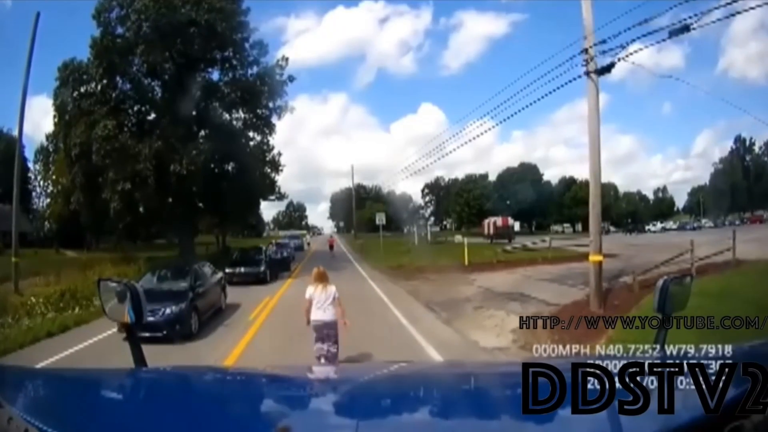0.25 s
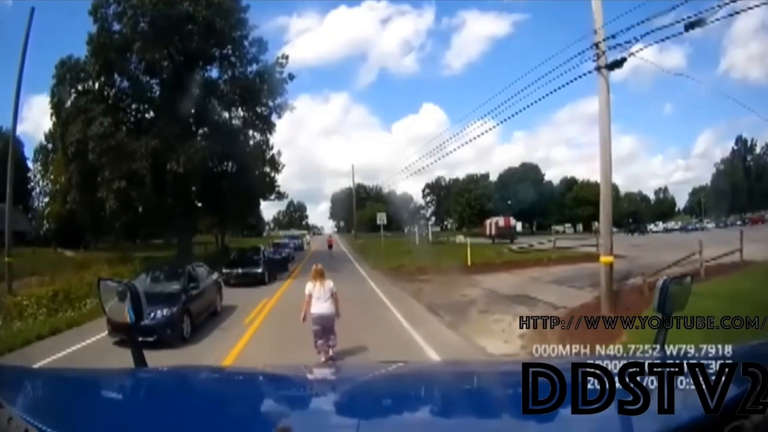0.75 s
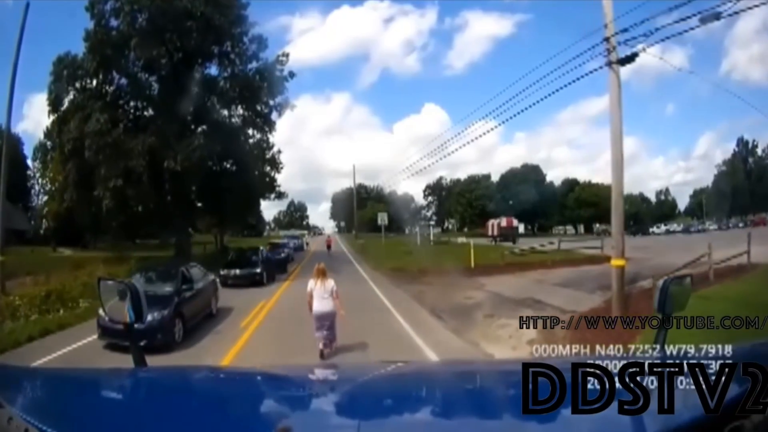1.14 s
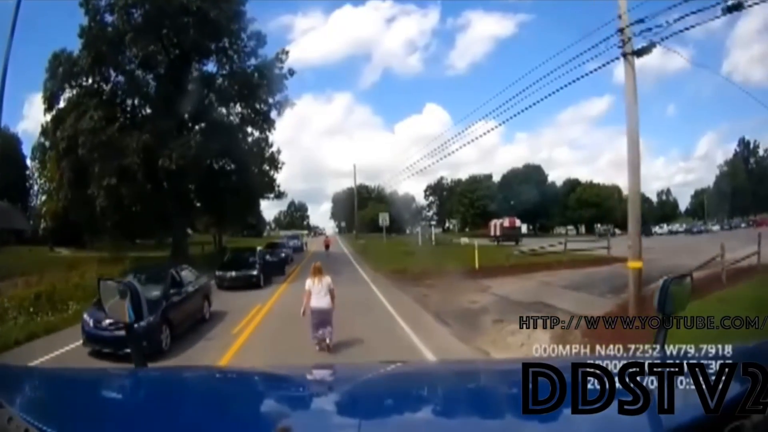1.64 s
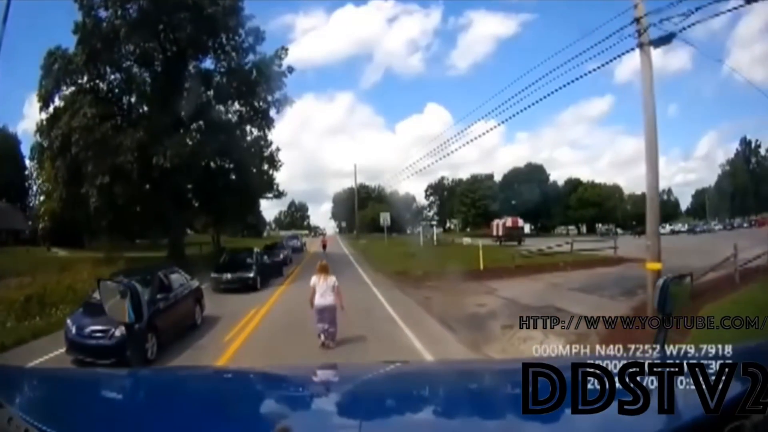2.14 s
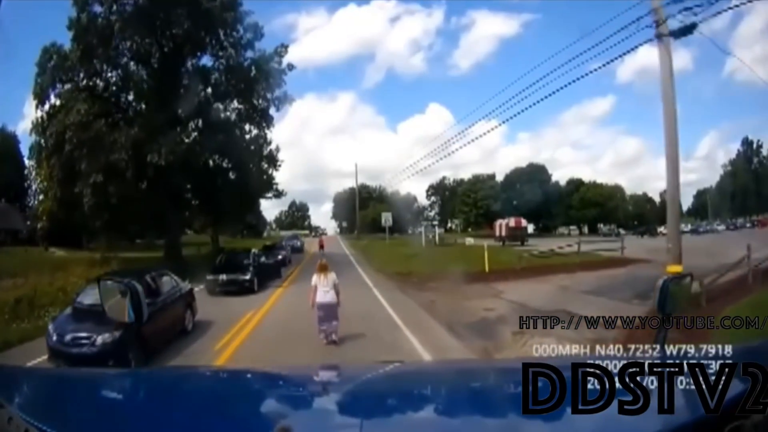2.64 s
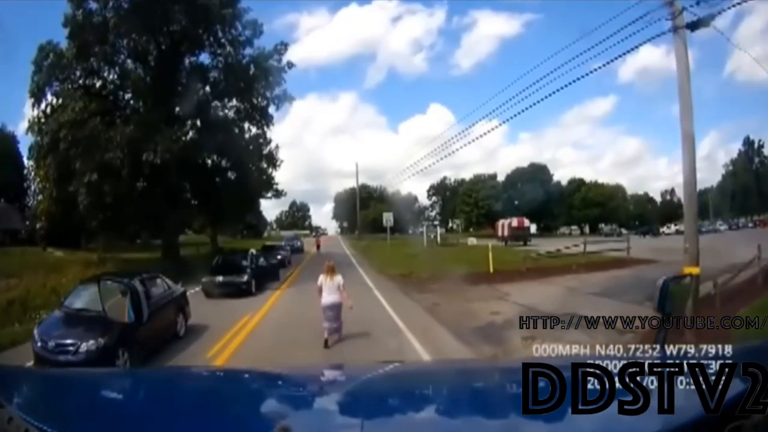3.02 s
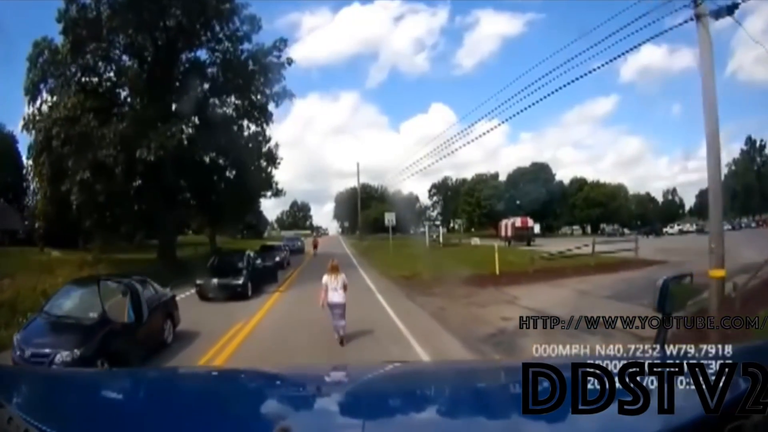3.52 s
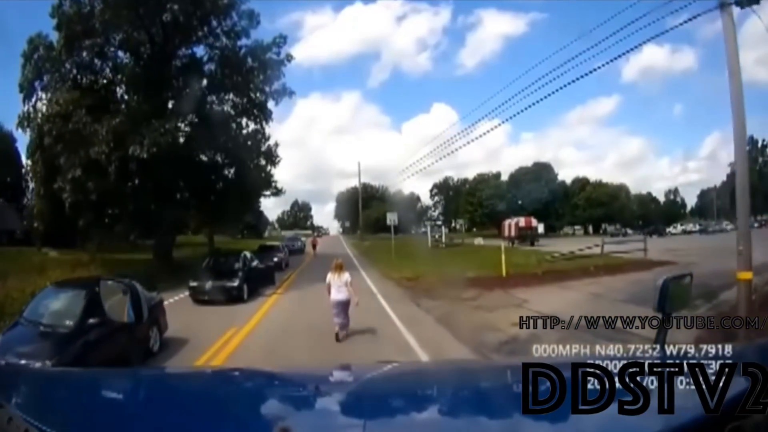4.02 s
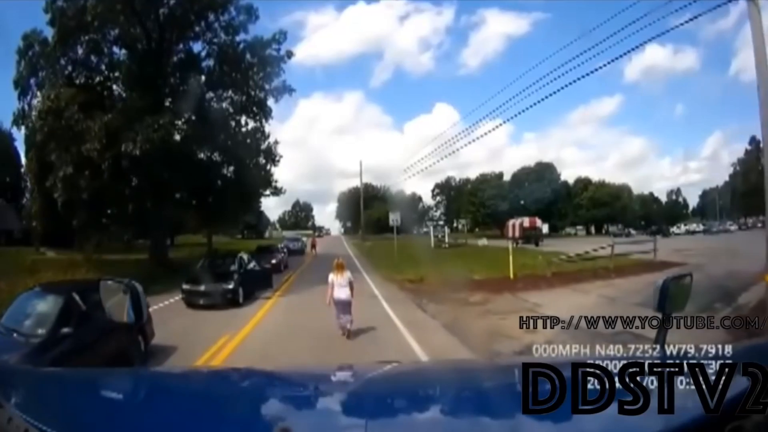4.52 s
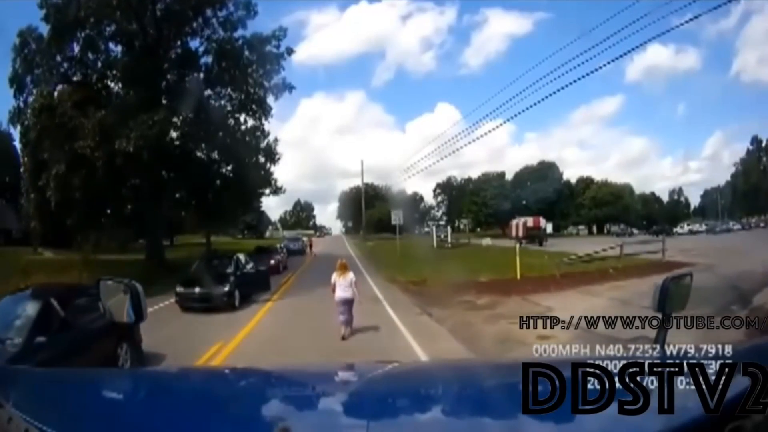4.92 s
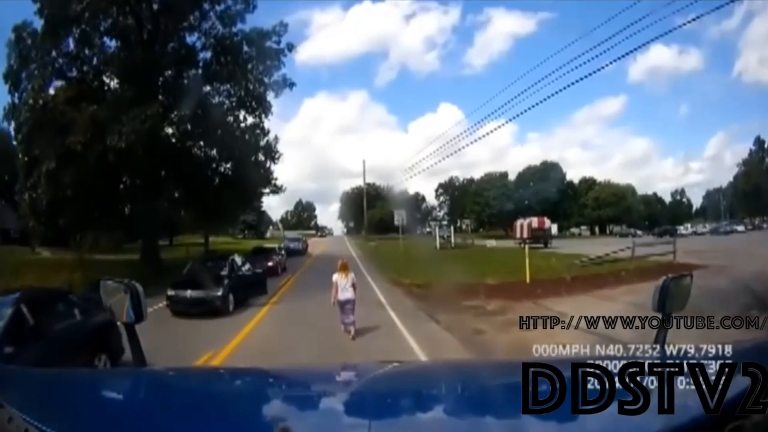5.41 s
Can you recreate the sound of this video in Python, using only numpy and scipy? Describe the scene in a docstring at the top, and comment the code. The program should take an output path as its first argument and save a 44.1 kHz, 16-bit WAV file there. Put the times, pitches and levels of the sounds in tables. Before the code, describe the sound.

Inside a slow truck, dull engine and road noise with trim thumps gives way to a sudden, unbroken, low-pitched horn blast.

```python
"""Inside the cab of a truck rolling slowly along a road: engine rumble, road noise, a faint whistle, soft rattles.
The cab is shaped noise with a sine at the firing rate; the rattles are noise bursts that decay exponentially.
The horn starts with sharp pops that ring its bell and a squawk of short off-pitch notes. It slides up to pitch
and is held in one long, steady blast, a sum of harmonics. A faint noise fizz pulses with the blast, and a crackle
of random clicks thickens."""
import sys
import numpy as np
from scipy import signal
from scipy.fft import rfft, irfft, next_fast_len
from scipy.io import wavfile
from scipy.ndimage import uniform_filter1d, map_coordinates

SR = 44100
rng = np.random.default_rng(int(sys.argv[2]) if len(sys.argv) > 2 else 0)


def materialize(psi):
    """Save the field psi as 16-bit PCM at rate SR to the path in sys.argv[1].

    A 1-D psi becomes a single channel; in a 2-D psi each row is a channel.
    """
    bounded = np.clip(np.atleast_2d(psi).T, -1, 1)
    quanta = np.round(bounded * 32767).astype(np.int16)
    wavfile.write(sys.argv[1], SR, quanta)


N = 249606  # samples


def amp(db):
    """Level to gain: 20 dB is a factor of ten in amplitude."""
    return 10 ** (np.asarray(db) / 20)


def unit(x):
    """Normalisation to an rms amplitude of 1."""
    return x / np.sqrt(np.mean(x ** 2) + 1e-20)


def curves(rows):
    """Linear interpolation in time: one signal for each column after t."""
    times, *columns = np.transpose(rows)
    return [np.interp(np.arange(N) / SR, times, column) for column in columns]


def since(start):
    """Elapsed time in s since start, zero before it."""
    return np.maximum(np.arange(N) / SR - start, 0)


def step(at, rise):
    """Smooth transition: a tanh step from 0 to 1, half way at the given time."""
    return .5 + .5 * np.tanh((np.arange(N) / SR - at) / (2 * rise))


def wobble(rate):
    """Slow random modulation: a spline through normal random knots, rate of them a second."""
    knots = rng.standard_normal(int(N * rate / SR) + 4)
    return map_coordinates(knots, [np.arange(N) * rate / SR])


def filtered(x, response):
    """Linear filtering: the spectrum of x times a complex frequency response."""
    m = next_fast_len(N + SR // 2)  # zero padding leaves room for the tail
    return irfft(rfft(x, m) * response(np.fft.rfftfreq(m, 1 / SR)), m)[:N]


def coloured(x, spectrum):
    """Spectral shaping by (f/Hz, level/dB) points on a log frequency axis, then rms 1."""
    f, db = np.transpose(spectrum)
    return unit(filtered(x, lambda hz: amp(np.interp(np.log(hz + 1), np.log(f), db))))


def noise(spectrum):
    """Gaussian white noise, spectrally shaped, of rms 1."""
    return coloured(rng.standard_normal(N), spectrum)


def ring(x, modes):
    """Modal resonance: x drives parallel band-pass modes of alternating sign."""
    def response(f):
        total = 0
        for k, (centre, width, db) in enumerate(modes):
            damping = 1j * f * width
            total = total + (-1) ** k * amp(db) * damping / (centre * centre - f * f + damping)
        return total
    return filtered(x, response)


def bursts(times, levels, t60):
    """Exponential decay: the envelope jumps to each level and loses 60 dB in t60 seconds."""
    t = np.arange(N) / SR
    return sum((t >= s) * amp(db - 60 * np.abs(t - s) / t60) for s, db in zip(times, levels))


# course of the rumble: (t/s, level/dB)
RUMBLE_COURSE = [(0.05, -44), (1.09, -48), (1.57, -48.5), (1.89, -57.5), (3.04, -51), (5.55, -52.5)]
# relative spectra of rumble, boom in the cab and road noise: (f/Hz, level/dB per Hz)
RUMBLE_SPECTRUM = [(15, -24), (25, -4.5), (36, -3.5), (55, -0.5), (75, -9), (120, -29.5), (500, -120)]
BOOM_SPECTRUM = [(40, -35.5), (80, -9.5), (120, -6.5), (170, -0.5), (220, 0), (260, 3), (320, -1),
                 (380, -10), (600, -56.5), (2000, -120)]
ROAD_SPECTRUM = [(200, -24), (380, 0.5), (550, -0.5), (800, 0.5), (1050, -2.5), (1250, -12), (1500, -24),
                 (1800, -22.5), (2400, -32), (2900, -38), (3600, -37.5), (5000, -49), (7000, -51),
                 (12500, -53), (15000, -66)]
# mean level in dB, and its change in dB per dB of rumble
BOOM_DB, BOOM_FOLLOWS = -39, .27
ROAD_DB, ROAD_FOLLOWS = -44, 0.12


def cab(firing_db=-1, lumps_db=0.87, drift_db=1.08):
    """Broadband and periodic sources: engine rumble and firing throb; boom and road levels follow weakly."""
    rumble_db, = curves(RUMBLE_COURSE)
    rumble_change_db = rumble_db - rumble_db.mean()  # level relative to its mean
    firing_hz = 29 + .6 * wobble(10)
    throb = np.sin(2 * np.pi * np.cumsum(firing_hz) / SR)
    firing = unit(throb * amp(1.7 * wobble(4.8)))
    engine = amp(rumble_db) * (noise(RUMBLE_SPECTRUM) + amp(firing_db) * firing)
    boom_db = BOOM_DB + BOOM_FOLLOWS * rumble_change_db + lumps_db * wobble(15)
    road_db = ROAD_DB + ROAD_FOLLOWS * rumble_change_db + drift_db * wobble(5.9)
    return engine + amp(boom_db) * noise(BOOM_SPECTRUM) + amp(road_db) * noise(ROAD_SPECTRUM)


WHINE_HZ, WHINE_FALL_HZ, WHINE_FALL_S = 3260, 366, 1.1  # final centre, fall, time constant
WHINE_START_DB, WHINE_FADE_DB = -82, 7  # first level and how much it fades on the way


def whistle(flicker_db=3.0):
    """Narrow-band noise: a randomly modulated sine sinks in pitch and fades as it winds down."""
    speed = np.exp(-(since(0) / WHINE_FALL_S) ** 2)
    phase = 2 * np.pi * np.cumsum(WHINE_HZ + WHINE_FALL_HZ * speed) / SR
    band = unit(wobble(300) * np.sin(phase) * amp(flicker_db * wobble(15)))
    return amp(WHINE_START_DB - WHINE_FADE_DB * (1 - speed)) * band


# knocks of the trim: (t/s, relative buzz level/dB, relative thump level/dB)
KNOCKS = [(0.275, -56, -38), (0.457, -55, -31), (0.633, -50.5, -33), (1.0, -59, -32.5), (1.189, -67, -46),
          (1.355, -54, -33), (1.622, -65, -39), (1.657, -66, -31)]
# relative spectra of the trim's buzz and its thump: (f/Hz, level/dB per Hz)
BUZZ_SPECTRUM = [(800, -20), (1750, -2), (2100, -11.5), (2450, -1), (2900, -20), (4700, -28), (6500, -37),
                 (15000, -44.5)]
THUMP_SPECTRUM = [(100, -31), (200, -1.5), (280, 6), (380, -15), (900, -11), (2500, -100)]


def rattles(buzz_db=-3, thump_db=-1):
    """Impact excitation: loose trim shakes as the cab rocks, each a dull thump with a small buzz on top."""
    def softened(envelope):
        return np.abs(uniform_filter1d(envelope, size=500))  # rounds off the onset
    times, buzz_levels, thump_levels = np.transpose(KNOCKS)
    buzz = noise(BUZZ_SPECTRUM) * softened(bursts(times, buzz_levels, t60=0.14))
    thump = noise(THUMP_SPECTRUM) * softened(bursts(times, thump_levels, t60=0.26))
    return amp(buzz_db) * buzz + amp(thump_db) * thump


START = 1.6965  # the horn comes on, s
CLICKS_PER_S, CLICKS_GROW_S = 190, 2.3  # full rate before the random clumping, and the time to reach it
# relative spectrum of the clicks: (f/Hz, level/dB per Hz)
CLICK_SPECTRUM = [(600, -22), (1500, 11), (3000, 9), (4500, 0.5), (7000, 1), (10000, -4.5), (14500, -6.5),
                  (16000, -18)]


def crackle(level_db=-67, scatter_db=2, clump_db=4.5, swell_db=4.5):
    """Random point process: brief puffs of noise come in clumps and grow denser up to a full rate."""
    rate = CLICKS_PER_S * np.minimum(since(START) / CLICKS_GROW_S, 1)
    clumping = amp(swell_db * wobble(18) + clump_db * wobble(45))
    hits = rng.random(N) < rate * clumping / SR
    strengths = amp(scatter_db * rng.uniform(-2, 2, N))
    puffs = np.convolve(hits * strengths, signal.windows.hann(50), "same")
    return amp(level_db) * coloured(puffs * rng.standard_normal(N), CLICK_SPECTRUM)


# the bell's own notes: (t/s, f/Hz, level/dB, half-length/s)
BELL_NOTES = [(1.722, 747, -27.5, 0.011), (1.756, 580, -23.5, 0.0051), (1.753, 590, -25, 0.0053),
              (1.774, 735, -31, 0.0035)]


def flares():
    """Free modes: the bell's own notes flare before the diaphragm locks them, heard as the squawk."""
    t = np.arange(N) / SR
    squawk = np.zeros(N)
    for s, hz, db, half in BELL_NOTES:
        envelope = np.exp(-((t - s) / half) ** 2)
        squawk += np.sqrt(2) * amp(db) * envelope * np.cos(2 * np.pi * hz * (t - s))
    return squawk


# pops as the horn starts: (t/s, relative kick level/dB, relative crack level/dB)
FIRST_BEATS = [(1.6968, -15, -6), (1.6986, 1, -13), (1.7058, 2, 0), (1.7612, -9, -11)]
# modes of the bell: (f/Hz, width/Hz, relative level/dB)
BELL_MODES = [(313, 130, -9.5), (824, 152, 5.5), (1017, 260, -4.5), (1480, 230, -16.5), (2610, 180, -23),
              (3230, 230, -39)]


def pops(ring_db=22, crack_db=-33, tail_db=-18):
    """Impulse response: the diaphragm's first uneven beats ring the bell, each with a crack and faint tail."""
    times, kick_levels, crack_levels = np.transpose(FIRST_BEATS)
    kicks = np.bincount(np.round(times * SR).astype(int), amp(kick_levels), N)
    dying = bursts(times, crack_levels, t60=0.022) + bursts(times, crack_levels + tail_db, t60=0.11)
    crack_spectrum = [(500, 1.0), (1200, 10.5), (3200, 4.0), (5000, -13.5), (9000, -25), (15000, -28.0)]
    crack = noise(crack_spectrum) * dying
    # a two-pole low-pass at 1900 Hz dulls the ringing
    ringing = filtered(ring(kicks, BELL_MODES), lambda hz: 1 / (1 + 1j * hz / 1900) ** 2)
    return amp(ring_db) * ringing + amp(crack_db) * crack


CATCH_S, CATCH_RISE_S, WEAK_DB = .058, 0.0031, -17  # the diaphragm catches: delay, rise, its swing until then
SURGE_DB, SURGE_AFTER_S, SURGE_S = 1.2, 0.028, .014  # overshoot: size, delay after catching, half-length


def swing():
    """Onset of self-oscillation, in dB: weak at first, then the diaphragm catches, overshoots once and holds."""
    caught = step(START + CATCH_S, CATCH_RISE_S)
    surge = np.exp(-((since(START) - CATCH_S - SURGE_AFTER_S) / SURGE_S) ** 2)
    return 20 * np.log10(amp(WEAK_DB) * (1 - caught) + caught) + SURGE_DB * surge


PITCH_HZ, SHARP_HZ, RELAX_S = 279.15, .8, .6  # settled pitch, extra sharpness, its time constant
SLIDE_HZ, SLIDE_S = 25, .04  # depth of the slide up from below, its time constant


def horn_pitch():
    """Frequency glide: the pitch slides up from below, lands slightly sharp and relaxes."""
    age = since(START)
    slide = SLIDE_HZ * np.exp(-(age / SLIDE_S) ** 2)
    return PITCH_HZ - slide + SHARP_HZ * np.exp(-age / RELAX_S)


# relative harmonics just after the start and once held: (harmonic number, level/dB)
FRESH_TONE = [(1, -2), (2, -25), (3, -18), (4, -20), (5, -29), (6, -30), (7, -39), (8, -45.5), (9, -38.5),
              (10, -52), (11, -52.5), (12, -55.5), (13, -56.5), (14, -56), (15, -56.5), (16, -57.5),
              (17, -63.5), (18, -60.5), (19, -57.5), (20, -58.5), (21, -61.5), (22, -61.5), (23, -63)]
HELD_TONE = [(1, -2), (2, -26), (3, -18), (4, -18), (5, -32.5), (6, -32), (7, -36), (8, -50), (9, -40.5),
             (10, -51), (11, -53.5), (12, -56.5), (13, -59), (14, -60.5), (15, -57), (16, -62.5),
             (17, -68.5), (18, -61.5), (19, -57), (20, -67), (21, -64), (22, -69.5), (23, -68)]
# relative spectrum of the fizz: (f/Hz, level/dB per Hz)
FIZZ_SPECTRUM = [(600, -27.5), (1300, 9), (2000, 4.5), (3000, -4), (4500, -7), (6000, -10), (7200, -16),
                 (10000, -18), (14500, -23.5)]
OVERTONE_RISE_DB, OVERTONE_RISE_S = 20, .015  # the whole tone rises from this far down, time constant
PULL_HZ, PULL_FADE_S = 42, 0.011  # the lowest note lies this far sharp until the diaphragm catches


def horn(level_db=-14.0, lowest_db=-0.99, top_db=-1.48, waver_db=0.25, flutter_db=1.0, shimmer_db=2.0,
         jitter_hz=.16, fizz_db=-59.0, fizz_gain_db=2):
    """Harmonic synthesis: the diaphragm beats at one pitch; high harmonics waver most, fizz pulses each cycle."""
    swing_db = swing()
    rise_db = -OVERTONE_RISE_DB * np.exp(-since(START) / OVERTONE_RISE_S)
    settled, = curves([(2.0, 0), (2.5, 1)])
    pressed, = curves([(START, 0), (START + .008, 1)])
    phase = 2 * np.pi * np.cumsum(horn_pitch() + jitter_hz * wobble(25)) / SR
    # the lowest note starts sharp and settles into step with the overtones
    pull = PULL_HZ * (1 - step(START + CATCH_S, PULL_FADE_S))
    lag = 2 * np.pi * (np.cumsum(pull) - pull.sum()) / SR
    tone = np.zeros(N)
    for k, ((_, fresh_db), (_, held_db)) in enumerate(zip(FRESH_TONE, HELD_TONE), start=1):
        harmonic_db = fresh_db * (1 - settled) + held_db * settled
        if k == 1:
            angle = phase + lag
            drive_db = lowest_db + swing_db + waver_db * wobble(18)
        else:
            angle = k * phase
            depth_db = np.interp(k, [4, 10], [flutter_db, shimmer_db])
            # the top harmonics only come once the diaphragm swings fully
            late = np.clip((k - 4) / 5, 0, 1)
            drive_db = late * (swing_db + top_db) + depth_db * (.5 * wobble(5) + wobble(24))
        # the bell delays each harmonic differently, which spreads the pulse
        spread = np.pi * k * k / 5
        tone += np.sqrt(2) * amp(harmonic_db + rise_db + drive_db) * np.cos(angle + spread)
    pulsing = unit(noise(FIZZ_SPECTRUM) * (1 + .5 * np.cos(phase)))
    fizz = amp(fizz_db + rise_db + fizz_gain_db * settled) * pulsing
    return pressed * (amp(level_db) * tone + fizz)


def scene():
    """Superposition: the pressures of all sources add in the cab."""
    background = cab() + whistle() + rattles()
    blast = crackle() + flares() + pops() + horn()
    return (background + blast)[None]


TOP_HZ = 15200  # band limit


def record(dry):
    """Band limitation: an ideal low-pass keeps nothing at or above TOP_HZ."""
    return filtered(dry[0], lambda hz: hz < TOP_HZ)[None]


dry = scene()
out = record(dry)
materialize(out)
```